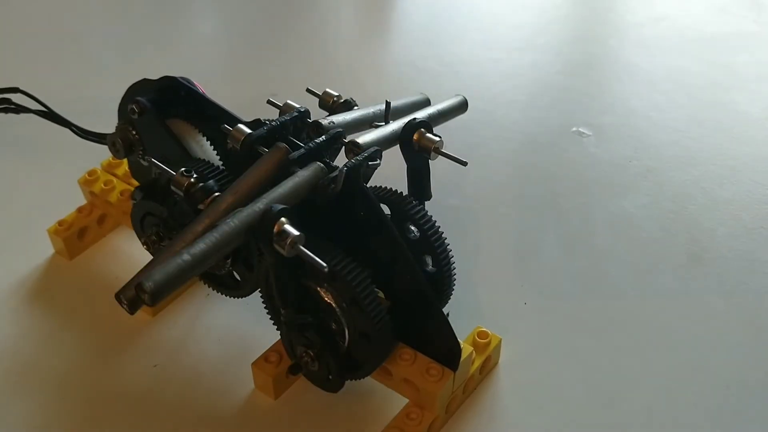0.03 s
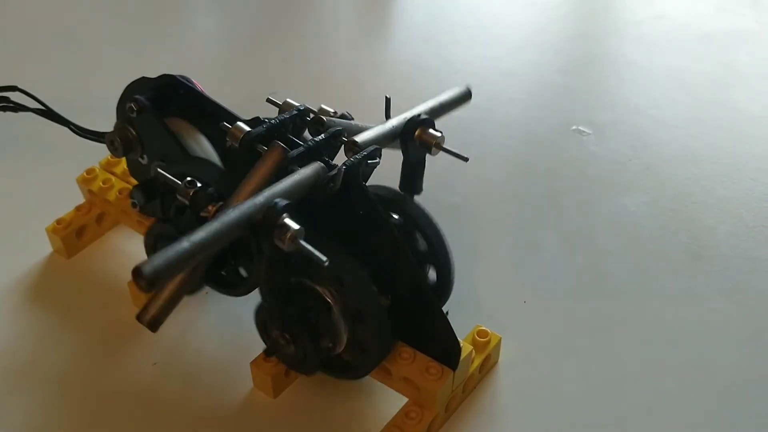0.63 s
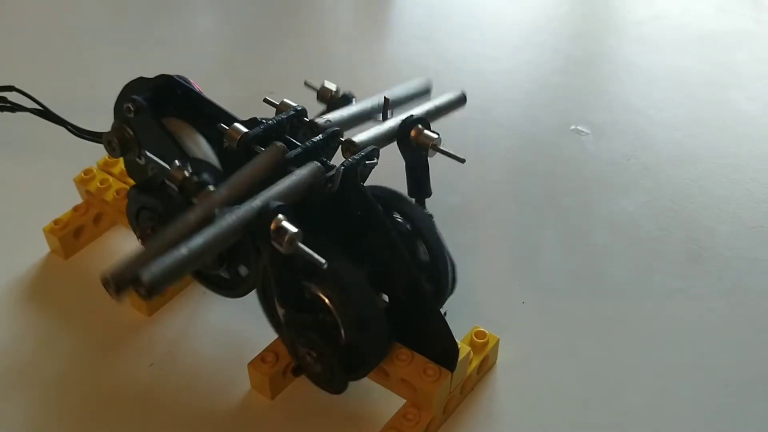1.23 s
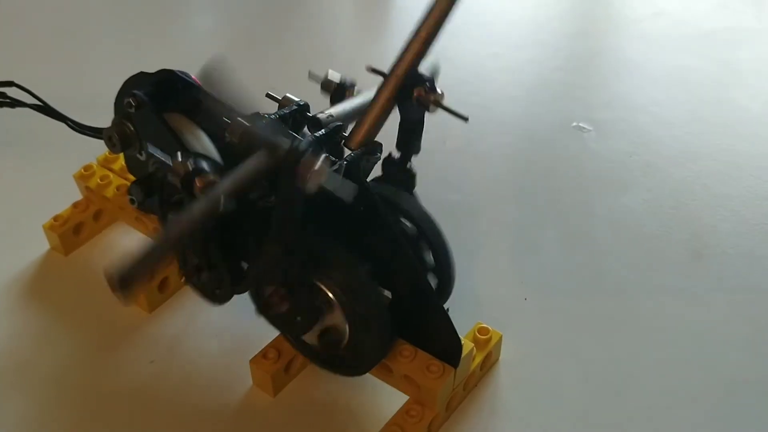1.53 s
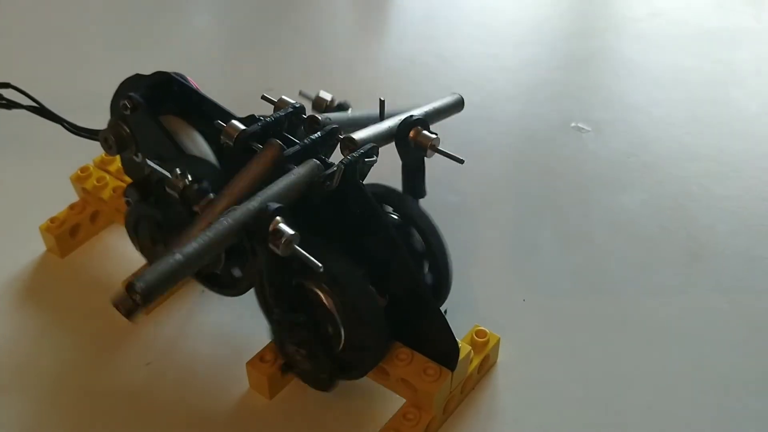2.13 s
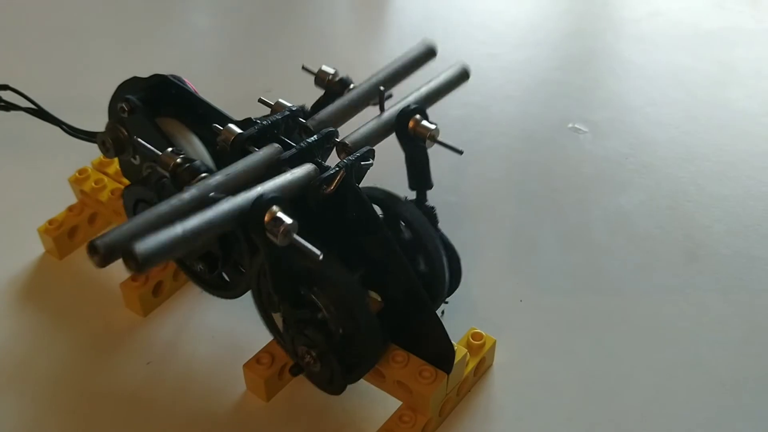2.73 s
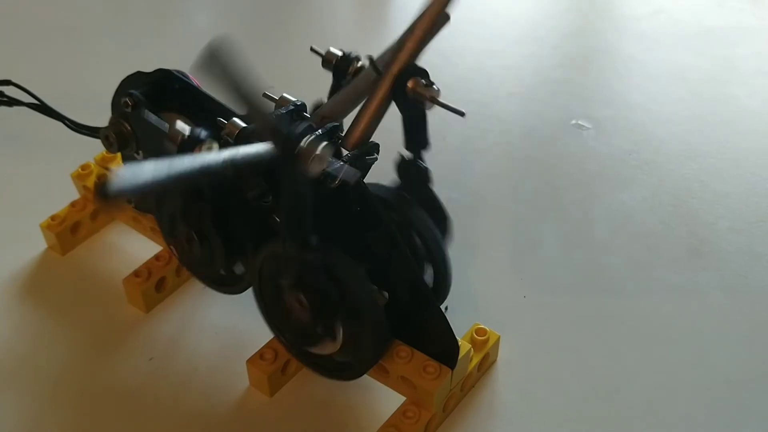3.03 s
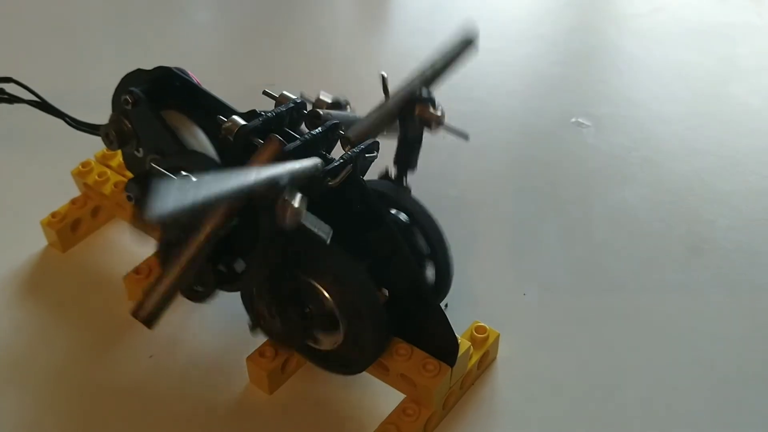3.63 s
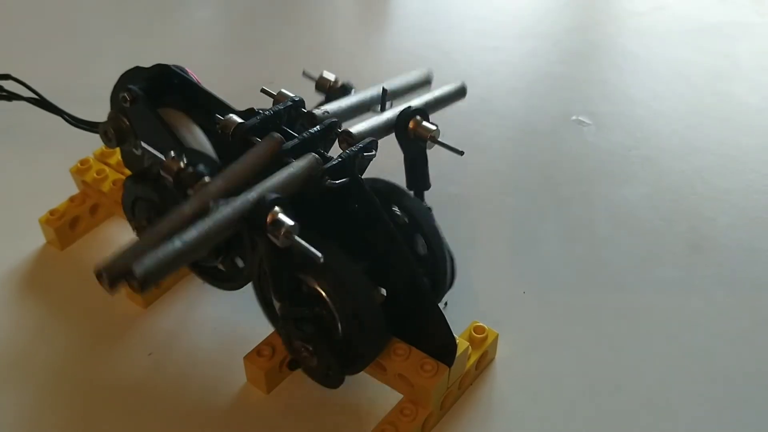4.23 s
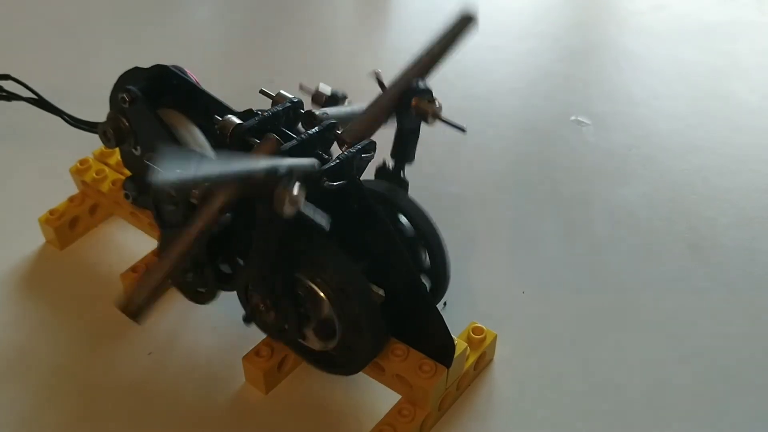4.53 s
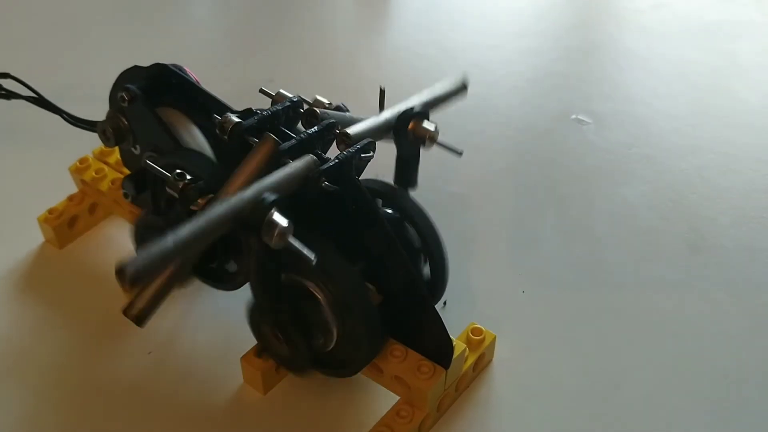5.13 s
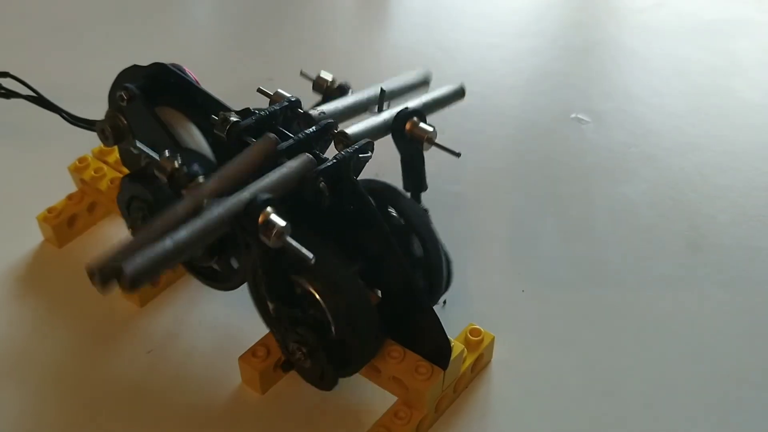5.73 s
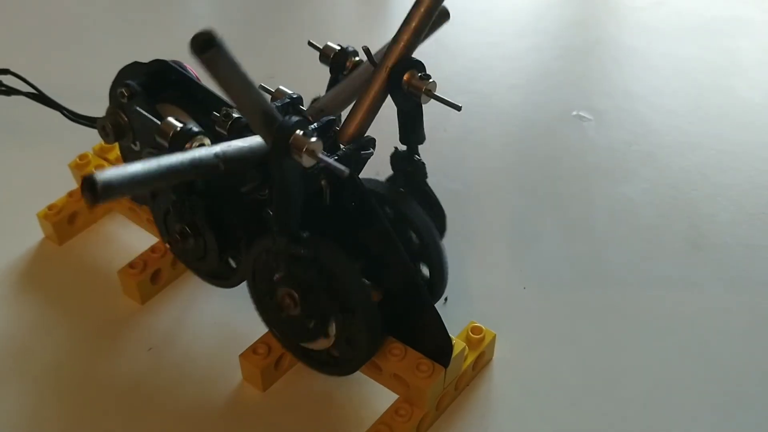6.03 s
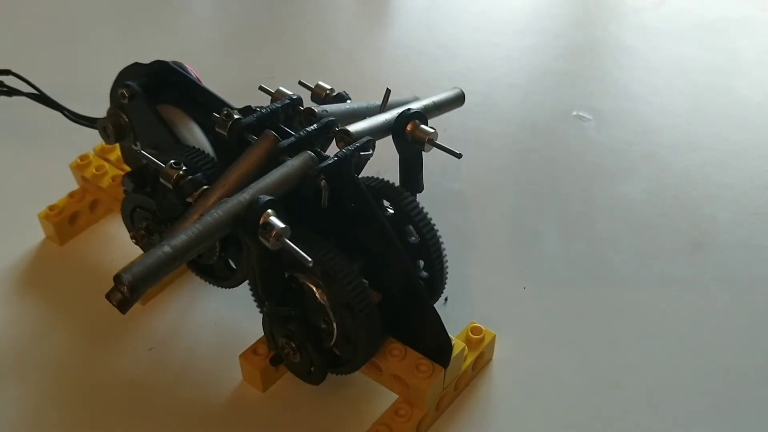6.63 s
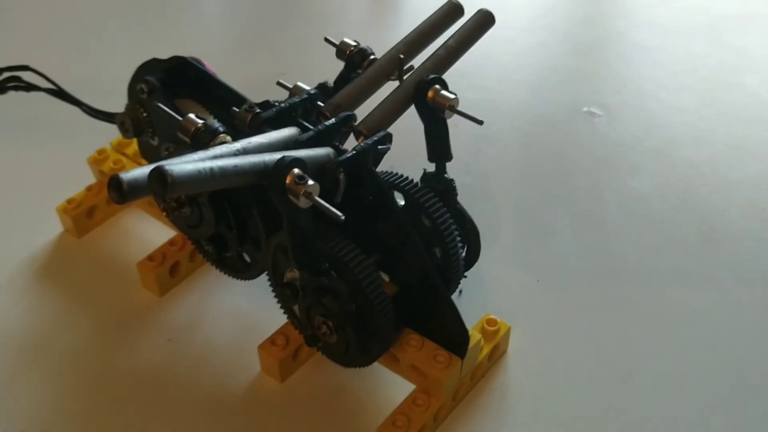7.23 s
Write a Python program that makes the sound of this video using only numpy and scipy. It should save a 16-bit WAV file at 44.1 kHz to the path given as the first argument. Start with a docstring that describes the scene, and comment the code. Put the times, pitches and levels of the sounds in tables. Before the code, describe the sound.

Close by, a little motorized mechanism whirs and clatters, speeding up and slowing as it flaps metal rods, before it stops.

```python
"""On a table in a quiet room, close by, a small electric motor drives plastic gears that crank rods up and down.
The gears speed up and slow down with every flap. Tooth impacts excite the modes of the frame (chatter),
play in the linkage gives bursts of rattles, and the feet force the table top into vibration.
The motor whines while it has power, pauses briefly a few times, stops and gives one last click;
a faint creak follows."""
import sys
import numpy as np
from scipy import signal
from scipy.fft import rfft, irfft, next_fast_len
from scipy.io import wavfile
from scipy.ndimage import uniform_filter1d, map_coordinates

SR = 44100
rng = np.random.default_rng(int(sys.argv[2]) if len(sys.argv) > 2 else 0)


def pcm_store(signal):
    """Save signal as 16-bit PCM."""
    levels = np.round(np.clip(np.atleast_2d(signal), -1, 1) * 32767)
    wavfile.write(sys.argv[1], SR, levels.astype(np.int16).T)


N = 330750
TIME = np.arange(N) / SR
MID = np.array([[1], [0]])  # puts a signal in the row of a pair that stereo() sends to the centre

# spans in which the motor has power: on t/s, off t/s
POWERED = [(-.05, .131), (.248, .29), (.302, 2.925), (3.046, 6.598), (6.725, 6.997), (7.11, 7.115)]
# spans in which the gears carry the rods: from t/s, to t/s
UNDER_LOAD = [(-.05, 0.18), (0.374, 2.855), (3.082, 6.55), (6.82, 7.06)]
# tooth-meshing rate, which arches with each flap: t/s, f/Hz
MESH_RATE = [(0, 720), (.3, 580), (.42, 1060), (.54, 1070), (.64, 880), (.76, 620), (.9, 660), (1.06, 960),
             (1.24, 1200), (1.33, 900), (1.45, 720), (1.6, 1020), (1.73, 1220), (1.86, 1030), (2.06, 820),
             (2.19, 1030), (2.33, 760), (2.54, 760), (2.69, 1060), (2.85, 740), (3.05, 600), (3.12, 1230),
             (3.2, 1310), (3.31, 1270), (3.4, 880), (3.55, 700), (3.68, 1160), (3.8, 1190), (3.94, 700),
             (4.13, 1130), (4.25, 1220), (4.33, 980), (4.42, 760), (4.53, 1050), (4.63, 1090), (4.74, 760),
             (4.86, 600), (4.98, 800), (5.12, 1130), (5.25, 1310), (5.32, 1010), (5.39, 780), (5.52, 700),
             (5.74, 1040), (5.9, 660), (6.1, 580), (6.36, 720), (6.6, 580), (6.8, 600), (6.9, 700)]
# flaps of the rods: middle t/s, half length/s, stroke chatter level/dB, following lull's chatter level/dB,
# table thump gain/dB, treble left minus right/dB, mesh tone gain/dB
ROD_FLAPS = [(0.0, 0.066, -24, -30, -47, 2.5, -13.5), (.535, 0.2, -22, -27, -48, 3.5, -11),
             (1.15, 0.19, -21, -25, -48.5, 5.5, -11), (1.75, 0.21, -22, -21, -50.5, 4.5, -10.5),
             (2.17, 0.13, -22.5, -23.5, -46, 6.5, -12), (2.43, 0.11, -22, -24.5, -35, 6, -17),
             (2.7, 0.095, -23, -24.5, -49.5, 4, -11.5), (3.22, 0.24, -24, -25, -43.5, 5, -8.5),
             (3.755, 0.16, -22.5, -25.5, -41.5, 1.2, -10.5), (4.195, 0.21, -21.5, -26.5, -47, 3, -10.5),
             (4.62, 0.2, -22.5, -31.5, -44.5, 4, -11.5), (5.195, 0.28, -23, -24.5, -47, 4, -9.5),
             (5.72, 0.21, -23, -29.5, -45.5, 4, -9.5), (6.37, 0.18, -26.5, -29, -47.5, 3, -8),
             (6.87, 0.061, -26, -28, -46, 3, -11.5)]
# hardest clacks of the linkage: t/s, level/dB
HARD_CLACKS = [(0.128, -41), (0.32, -39), (0.409, -9), (0.43, -13.5), (0.467, -13.5), (0.488, -14.5),
               (0.531, -13.0), (0.549, -14.5), (0.592, -14.5), (0.641, -16.5), (0.66, -21), (0.725, -19),
               (0.746, -21.5), (0.938, -17.5), (1.017, -13), (1.088, -13.5), (1.106, -14), (1.146, -10.5),
               (1.203, -12.0), (1.257, -15.5), (1.295, -14.5), (1.32, -18.5), (1.365, -16.5), (1.388, -22),
               (1.461, -18), (1.534, -22), (1.562, -17), (1.579, -16.5), (1.607, -18.5), (1.626, -13.5),
               (1.646, -16.5), (1.667, -19.5), (1.685, -12.0), (1.739, -16.5), (1.783, -17.5),
               (1.826, -12.5), (1.842, -19), (1.889, -13.5), (1.912, -18), (1.953, -16.5), (2.027, -17),
               (2.046, -18), (2.077, -15.5), (2.094, -18), (2.149, -14), (2.171, -16), (2.192, -21),
               (2.213, -16), (2.23, -14.5), (2.276, -16), (2.356, -13.5), (2.38, -16.5), (2.407, -16.5),
               (2.426, -14.5), (2.455, -20.0), (2.488, -18.5), (2.516, -18), (2.535, -19), (2.566, -17.0),
               (2.582, -15.5), (2.612, -19.0), (2.636, -18.0), (2.656, -15), (2.677, -19), (2.697, -17),
               (2.715, -14.5), (2.737, -17), (2.758, -12), (2.848, -21), (3.098, -17.5), (3.12, -14),
               (3.162, -19.5), (3.213, -18), (3.248, -22.5), (3.263, -18.5), (3.296, -21), (3.348, -12.0),
               (3.395, -18.5), (3.526, -20), (3.622, -16), (3.648, -19), (3.671, -19), (3.69, -12),
               (3.709, -17), (3.726, -18.5), (3.745, -13.0), (3.799, -13.5), (3.836, -12.5), (3.852, -19.5),
               (3.909, -20.5), (3.998, -13), (4.059, -14.5), (4.077, -17), (4.101, -19.5), (4.122, -17.0),
               (4.143, -13), (4.196, -13.5), (4.249, -17.5), (4.284, -15), (4.303, -16.5), (4.326, -20.5),
               (4.347, -19.5), (4.416, -19.5), (4.436, -16.0), (4.467, -20.5), (4.512, -16.5), (4.536, -16),
               (4.56, -19), (4.58, -13.5), (4.619, -17), (4.636, -14.5), (4.658, -22.5), (4.68, -13),
               (4.693, -17), (4.753, -17), (4.864, -21.5), (4.957, -17.5), (4.977, -16.5), (5.005, -16.5),
               (5.033, -18), (5.058, -16.5), (5.074, -17.5), (5.116, -15), (5.171, -15.5), (5.203, -18.5),
               (5.221, -22), (5.254, -20.0), (5.266, -18.5), (5.306, -10.5), (5.325, -14.5), (5.374, -13),
               (5.434, -13.5), (5.455, -19.5), (5.522, -18.5), (5.61, -17), (5.629, -17), (5.658, -20.0),
               (5.683, -15.5), (5.7, -16), (5.724, -17.5), (5.745, -13.5), (5.763, -15.0), (5.804, -13),
               (5.864, -19), (5.966, -19), (6.227, -20), (6.249, -22.5), (6.324, -15.5), (6.422, -17.5),
               (6.44, -23.0), (6.52, -23), (6.86, -18), (6.892, -21), (6.989, -33)]
# resonances of gears, frame and rods: f/Hz, width/Hz, level/dB
FRAME_MODES = [(670, 119, -8), (849, 71, -5.5), (978, 276, -6), (1150, 140, -2), (1350, 220, -5),
               (1810, 586, -3.5), (1987, 160, -8), (2418, 420, -0.9), (2709, 194, -0.5), (3070, 510, -5),
               (3610, 690, -1), (4320, 1200, -4), (5100, 1400, -2), (5920, 790, 1), (6490, 540, -0.5),
               (6870, 330, 0), (7600, 680, 0.4), (8135, 790, -2.5), (9840, 1290, -0.5), (10230, 350, -3),
               (11330, 1300, -5.5), (12270, 3800, -11.5), (15078, 1600, -25.5)]
# narrow resonances of the metal rods: f/Hz, width/Hz, level/dB
ROD_MODES = [(1943, 59, 1.5), (2443, 110, -4), (2692, 91, -1), (6870, 180, 0), (10020, 190, -1)]
# resonances of the gear housing: f/Hz, width/Hz, level/dB
HOUSING_MODES = [(1198, 260, 1), (1960, 220, -2.5), (3530, 420, -10.5)]
# envelope of the motor's sound while it has power: t/s, level/dB
MOTOR_LEVEL = [(0, -31.5), (.3, -34), (.9, -29.5), (2.75, -34), (2.92, -33), (3.1, -30.5), (3.5, -31),
               (4.9, -31.5), (5.9, -32.5), (6.4, -38.5), (6.73, -36.5), (6.87, -32.5), (7, -38),
               (7.11, -34)]
# inrush of current at a start, which hardens the commutator's ticks: t/s, boost/dB
INRUSHES = [(.25, 3), (.302, 6), (3.048, 5)]
# resonances of the motor's case: f/Hz, width/Hz, level/dB
CASE_MODES = [(1200, 610, -13), (2040, 570, -7.5), (4400, 1500, -21), (6200, 1300, -14.5), (7490, 540, -2),
              (15200, 750, -18.5)]
# resonances of the table under the feet: f/Hz, width/Hz, level/dB
TABLE_MODES = [(150, 38, -5.5), (189, 39, -3), (225, 17, -5), (270, 81, -9), (347.6, 65, -7.5),
               (460, 72, -9.5), (530, 30, -4.5)]
# spectral density of the room noise: f/Hz, relative level/dB
AIR_SPECTRUM = [(15, -35.5), (25, -3), (109, -8.5), (655, -25.5), (1030, -25.5), (1720, -24.5),
                (1910, -28.5), (3260, -26.5), (6720, -26), (9020, -42.5), (15000, -46.5)]
# a foot of the mechanism lifts and drops: t/s, level/dB
FOOT_DROPS = [(0.386, -40), (.98, -49.5), (1.281, -43.5), (2.259, -40.5), (2.329, -41), (4.938, -40.5),
              (5.33, -42), (5.41, -46), (5.73, -44.5), (5.785, -41), (5.86, -47)]
# a rod rubs in its joint: t/s, half length/s, f/Hz, level/dB
JOINT_RUBS = [(1.28, .035, 5940, -30), (2.21, 0.082, 5740, -28), (3.756, 0.091, 5400, -29.5),
              (4.658, 0.049, 5730, -35), (5.324, 0.033, 5000, -28.5), (6.39, 0.049, 2620, -34.5)]
# modes of gears and rods in the last click: f/Hz, level/dB, T60/s
CLICK_MODES = [(188, -4, 0.22), (1220, -11, .06), (2000, 2, .025), (2159, 2, .035), (2690, 4, .035),
               (4167, -4, .035), (4650, 2, .025)]
# resonances of the creak: f/Hz, width/Hz, level/dB
CREAK_MODES = [(510, 140, -7.5), (643, 36, -2), (770, 140, -12), (1070, 130, -6.5), (1385, 50, -6),
               (1755, 570, -20.5), (5900, 2000, -30)]
# reverberation time of the room: f/Hz, T60/s
ROOM_DECAY = [(200, 0.31), (1200, 0.27), (5000, 0.21), (8000, 0.14), (14000, 0.19)]
# likeness of left and right: f/Hz, coherence (0 to 1)
COHERENCE = [(200, 1), (330, 0.97), (450, 0.78), (650, 0.91), (1100, 1), (1380, 0.77), (1650, 0.12),
             (2400, 0.48), (3600, 0.39), (6400, 0.16), (7700, 0.18), (8800, 0.12), (10200, 0.53),
             (13500, 0.14)]
# balance of the channels: f/Hz, left minus right level/dB
BALANCE = [(1500, 0), (2700, 0), (4400, 2), (5200, -3.5), (6600, 1.5), (8300, 1.5), (10200, 1), (12000, -5),
           (15000, -3)]

TEETH = 65  # mesh cycles per turn; speed is in turns per second throughout


def amp(db):
    """Amplitude ratio of a level in decibels."""
    return 10 ** (np.asarray(db) / 20)


def unit(x):
    """Normalisation to rms 1."""
    return x / np.sqrt(np.mean(x ** 2) + 1e-20)


def along(points, hz):
    """Interpolation of (f/Hz, value) points on a logarithmic frequency axis."""
    f, v = np.transpose(points)
    return np.interp(np.log(hz + 1), np.log(f), v)


def curves(rows):
    """Linear interpolation in time: one value per sample for each column after t/s."""
    s, *cols = np.transpose(rows)
    return [np.interp(TIME, s, c) for c in cols]


def wobble(rate):
    """Smooth random modulation: a spline through rate Gaussian knots a second."""
    return map_coordinates(rng.standard_normal(int(N * rate / SR) + 4), [TIME * rate])


def window(start, stop, rise, fall):
    """Exponential growth from start and decay from stop; times and time constants in s."""
    return (1 - np.exp(-np.maximum(TIME - start, 0) / rise)) * np.exp(-np.maximum(TIME - stop, 0) / fall)


def filtered(x, response):
    """Linear filtering: the spectrum of x times a function of frequency."""
    size = next_fast_len(N + SR // 2)
    return irfft(rfft(x, size) * response(np.fft.rfftfreq(size, 1 / SR)), size)[..., :N]


def coloured(x, spectrum):
    """Spectral shaping by a curve of (f/Hz, level/dB) points."""
    return filtered(x, lambda hz: amp(along(spectrum, hz)))


def ring(x, modes, size=8192):
    """Forced response of a minimum-phase body of unit energy with modes (f/Hz, width/Hz, level/dB)."""
    hz = np.fft.rfftfreq(size, 1 / SR) + 1
    power = sum(amp(db) ** 2 / (1 + ((hz ** 2 - centre ** 2) / (hz * width)) ** 2) ** 2
                for centre, width, db in modes)
    cepstrum = irfft(np.log(power + 1e-12))[:size // 2]
    cepstrum[0] /= 2
    response = irfft(np.exp(rfft(cepstrum, size)))
    return signal.oaconvolve(x, response[None] / np.linalg.norm(response), axes=1)[:, :N]


def impacts(rate, scatter, spread_db):
    """Two impulse trains of rms 1, one knock a cycle, uneven in size and in time (scatter in cycles)."""
    cycle = np.cumsum(rate) / SR
    beats = np.arange(1, int(cycle[-1]))
    trains = []
    for late, size in rng.standard_normal((2, 2, len(beats))):
        at = np.searchsorted(cycle, beats + scatter * late).clip(0, N - 1)
        train = np.bincount(at, amp(spread_db * size.clip(-2, 2)), N)
        trains.append(unit(train - train.mean()))
    return np.array(trains)


def strokes():
    """Envelope of the rods' swing, 0 to 1: one flat-topped swell for each flap."""
    return np.max([np.exp(-np.square(np.square((TIME - s) / half))) for s, half, *_ in ROD_FLAPS], axis=0)


def chatter_level(swing, slack_db=-11.5, take_up_s=0.0108):
    """Tooth impacts grow with load: their level in dB follows stroke and lull, and falls when slack."""
    middle, _, stroke_db, lull_db, *_ = np.transpose(ROD_FLAPS)
    between = (middle + np.append(middle[1:], POWERED[-1][0])) / 2
    load = sum((np.tanh((TIME - start) / take_up_s) - np.tanh((TIME - stop) / take_up_s)) / 2
               for start, stop in UNDER_LOAD)
    in_stroke = swing * np.interp(TIME, middle, stroke_db)
    in_lull = (1 - swing) * np.interp(TIME, between, lull_db)
    return in_stroke + in_lull + slack_db * (1 - load)


def rattles(chatter, rate_hz=47.3, scatter_s=0.0017, typical_db=-5, spread_db=6, cap_db=6):
    """Backlash, crossed almost periodically, adds lesser rattles to the hard clacks: (t/s, level/dB)."""
    beats = np.arange(.04, POWERED[-2][1], 1 / rate_hz)
    late, size = rng.standard_normal((len(beats), 2)).T
    at = beats + scatter_s * late
    chatter_db = 20 * np.log10(np.interp(at, TIME, chatter) + 1e-9)
    db = chatter_db + np.minimum(typical_db + spread_db * size, cap_db)
    free = np.abs(at[:, None] - np.transpose(HARD_CLACKS)[0]).min(axis=1) > .7 / rate_hz
    return list(HARD_CLACKS) + list(zip(at[free], db[free]))


def rattle_power(clacks, width_s, jolt_db):
    """Power envelope of the rattles, and of the jolts at switch-off, as skewed Gaussian pulses."""
    power = np.zeros(N)
    jolts = [(stop - .006, jolt_db) for _, stop in POWERED[:-1]]
    for s, db in clacks + jolts:
        near = slice(round(s * SR) - SR // 40, round(s * SR) + SR // 40)
        t = TIME[near] - s
        skew = np.where(t < 0, 1.31, 0.9)  # builds more slowly than it fades
        power[near] += amp(db) ** 2 * np.exp(-(t / (width_s * skew)) ** 2 / 2)
    return power


def gearbox(speed, chatter, clacks, song_db):
    """Impact excitation: teeth strike once a mesh cycle, and loose joints add showers of tiny contacts."""
    mesh_hz = TEETH * speed * (1 + .012 * wobble(40))
    running = chatter * amp(1.62 * wobble(150))
    bursts = np.sqrt(rattle_power(clacks, width_s=0.0026, jolt_db=-47))
    teeth = amp(-11.0) * running * impacts(mesh_hz, scatter=.3, spread_db=5.5)
    scrape = amp(-2.5) * running * impacts(9 * mesh_hz, scatter=1.5, spread_db=6.0)
    clatter = amp(-1.25) * bursts * impacts(5 * mesh_hz, scatter=1.5, spread_db=4.5)
    # hard contacts are brighter than the running teeth
    clatter = coloured(clatter, [(600, -7.5), (2500, -6.5), (6500, 2.0), (14000, -0.5)])
    # slower gears knock more softly, which leaves more of the low ring
    dull_noise = coloured(rng.standard_normal((2, N)), [(1200, 3), (3000, 0.5), (6000, -15.5)])
    soft = amp(-3.5) * running * (12 / speed) ** 1.8 * dull_noise
    body = wandering_contact(ring(teeth + scrape + clatter + soft, FRAME_MODES), depth_db=2.5)
    force = np.sqrt(running ** 2 + .5 * rattle_power(clacks, width_s=0.0038, jolt_db=-45.5))
    return body + pings(force, speed) + amp(song_db) * mesh_song(force, speed, mesh_hz) * MID


def wandering_contact(x, depth_db):
    """Timbre depends on the contact points, which wander: a smooth random gain in time and frequency."""
    spectra = signal.stft(x, nperseg=512)[2]
    field = uniform_filter1d(rng.standard_normal(spectra.shape[1:]), size=4, axis=0)
    field = uniform_filter1d(field, size=5, axis=1)
    gain = amp(depth_db * unit(field).clip(-2, 2))
    return signal.istft(spectra * unit(gain), nperseg=512)[1][:, :N]


def pings(force, speed):
    """Impulse response: single teeth land hard, click in the frame and set the metal rods ringing."""
    knocks = force * impacts(14 * speed, scatter=.5, spread_db=4.0)
    return amp(-14.5) * ring(knocks, ROD_MODES) + amp(-10.5) * ring(knocks, FRAME_MODES)


def mesh_song(force, speed, mesh_hz, off_resonance=0.53):
    """Resonance: each harmonic of the mesh rate flares as it sweeps through a mode of the housing."""
    phase = 2 * np.pi * np.cumsum(mesh_hz) / SR
    song = np.zeros(N)
    for order in range(1, 4):
        lift = sum(amp(db) / (1 + ((order * mesh_hz - hz) / (width / 2)) ** 2)
                   for hz, width, db in HOUSING_MODES)
        throb = unit(amp(5 * wobble(130).clip(-2, 1.2)))
        blur = 1.15 * wobble(140)  # play between the teeth jitters the phase
        song += np.hypot(lift, off_resonance / order) * throb * np.sin(order * phase + blur)
    return force * (speed / 18) ** 1.6 * song


def motor(speed, swing, whine_hz=7620, stroke_dip_db=-1.5):
    """Forced vibration: switched current whines near a resonance of the case, which commutation ticks."""
    switch = sum(window(start, stop, rise=0.0032, fall=0.0017) for start, stop in POWERED)
    supply = amp(curves(MOTOR_LEVEL)[0]) * switch
    current = supply * amp(stroke_dip_db * swing + 2.1 * wobble(22))
    phase = 2 * np.pi * whine_hz * TIME + 1.2 * wobble(48) + .15 * wobble(400)
    whine = unit(amp(1.3 * wobble(140)) * (np.sin(phase) + amp(-24.0) * np.sin(2 * phase)))
    inrush_db = sum(db * window(s, s, rise=.001, fall=0.099) for s, db in INRUSHES)
    commutation = impacts(90 * speed, scatter=.4, spread_db=6.0)
    ticks = ring(current * amp(inrush_db) * commutation, CASE_MODES)
    return amp(-3.5) * current * whine * MID + amp(-4.0) * ticks


def table_top(speed, turning, clacks, thump_db, crawl_speed=8.5):
    """Structure-borne sound: the feet drum on the table, rattles thump it, switching rocks the frame."""
    shake = turning * amp(-55 + 0.3 * (speed - crawl_speed))
    drumming = ring(shake * impacts(40 * speed, scatter=.8, spread_db=4.0), TABLE_MODES)
    blows = np.sqrt(rattle_power(clacks, width_s=0.0086, jolt_db=-20.5)) * rng.standard_normal((2, N))
    thumps = amp(thump_db) * ring(blows * (speed / 17) ** 3, [(79.5, 70, 0.0038), (130, 44, 0.0049)])
    kicks = sum(window(s, s, rise=.004, fall=0.025) for s in np.ravel(POWERED)[1:-2])
    rocking = amp(-47) * kicks * np.sin(2 * np.pi * 240 * TIME + 1.9 * wobble(110))
    return drumming + thumps + (rocking + foot_drops()) * MID


def background():
    """Ambient noise: a faint continuous spectrum and one low hum."""
    air = unit(coloured(rng.standard_normal((2, N)), AIR_SPECTRUM))
    hum = amp(-68.0 + wobble(3)) * np.sin(2 * np.pi * 47.6 * TIME)
    return amp(-72.0) * air + hum * MID


def foot_drops():
    """A soft impact excites only low frequencies: each drop of a foot rings the table's lowest mode."""
    boom = np.zeros(N)
    for (s, db), detune in zip(FOOT_DROPS, rng.standard_normal(len(FOOT_DROPS))):
        mode = np.sin(2 * np.pi * (144 + 6 * detune) * (TIME - s))
        boom += amp(db) * window(s, s + 0.025, rise=0.013, fall=0.017) * mode
    return boom


def rubs(speed):
    """Stick-slip friction: quick slips in a joint ring one narrow band of the rod."""
    slips = impacts(300 * speed, scatter=1.7, spread_db=3.0) * amp(2.5 * wobble(100))
    return sum(amp(db) * ring(slips * np.exp(-np.square((TIME - s) / half)), [(hz, 650, 0)])
               for s, half, hz, db in JOINT_RUBS)


def last_click(at_s=7.111):
    """Damped free vibration: a last blip of power knocks the resting teeth together; the parts ring out."""
    t = np.maximum(TIME - at_s, 0)
    modes = sum(amp(db - 60 * t / t60) * np.sin(2 * np.pi * hz * t) for hz, db, t60 in CLICK_MODES)
    knock = rng.standard_normal((2, N)) * window(at_s, at_s + .002, rise=.001, fall=.002)
    return amp(-51.5) * modes * (1 - np.exp(-t / .001)) * MID + amp(-48.5) * ring(knock, CASE_MODES)


def creak(rasp_hz=92):
    """Amplitude modulation is heard as roughness: pulsing noise through resonances gives a faint creak."""
    slips = rng.standard_normal((2, N)) * (1 + 0.23 * np.sin(2 * np.pi * rasp_hz * TIME))
    return amp(-51.5) * ring(slips * window(7.333, 7.382, rise=0.002, fall=0.02), CREAK_MODES)


def room(x):
    """Reverberation, shorter in the treble; two tails crossfade as the moving rods change the paths."""
    wet, turn = 0, 3 * wobble(7)
    for share in (np.cos(turn), np.sin(turn)):
        hz, t, spectra = signal.stft(rng.standard_normal((2, SR // 2)), SR, nperseg=256)
        decay = amp(-60 * t / along(ROOM_DECAY, hz)[:, None])
        tail = signal.istft(spectra * decay, SR, nperseg=256)[1]
        tail = np.pad(tail / np.linalg.norm(tail[0]), ((0, 0), (SR // 300, 0)))  # arrives 3.3 ms late
        wet = wet + signal.oaconvolve(x * share, tail, axes=1)[:, :N]
    return wet


def stereo(pair, lead_samples=12):
    """Partial coherence: mid and side become left and right, bass alike, treble earlier on the left."""
    def mixing(hz):
        turn = np.arccos(np.clip(along(COHERENCE, hz), -1, 1)) / 2
        lead = np.pi * hz * lead_samples / SR * np.clip((hz - 1400) / 800, 0, 1)
        left = amp(along(BALANCE, hz) / 2) * np.exp(1j * lead)
        return np.array([[left * np.cos(turn), left * np.sin(turn)],
                         [np.cos(turn) / left, -np.sin(turn) / left]])
    return filtered(pair, mixing).sum(axis=1)


def shade(x, left_db, corner_hz=4000.0):
    """Acoustic shadow: the microphone's housing favours the near side's treble over the far side's."""
    treble = filtered(x, lambda hz: hz ** 4 / (hz ** 4 + corner_hz ** 4))
    return x + treble * (amp(np.array([[.5], [-.5]]) * left_db) - 1)


def scene():
    """Superposition of direct and reverberant sound; the last blip of power is too short to turn the gears."""
    turning = sum(window(start, stop, rise=.014, fall=0.0057) for start, stop in POWERED[:-1])
    speed = curves(MESH_RATE)[0] / TEETH
    swing = strokes()
    chatter = turning * amp(chatter_level(swing))
    clacks = rattles(chatter * amp(-6.5 * (1 - swing)))  # gentler between strokes
    *_, thump_db, sway_db, song_db = curves(ROD_FLAPS)
    gears = gearbox(speed, chatter, clacks, song_db)
    mechanism = gears + table_top(speed, turning, clacks, thump_db) + rubs(speed) + last_click()
    whine = motor(speed, swing)
    direct = shade(stereo(mechanism), sway_db) + shade(stereo(whine), left_db=4.1)
    far = creak()
    return direct + stereo(far + background() + amp(-13.5) * room(mechanism + whine + far))


def record(dry, ceiling=.85, top_hz=15800):
    """Soft saturation rounds the highest peaks, and a low-pass filter limits the band."""
    rounded = dry / (1 + np.abs(dry / ceiling) ** 6) ** (1 / 6)
    return filtered(rounded, lambda hz: hz < top_hz)


dry = scene()
out = record(dry)
pcm_store(out)
```